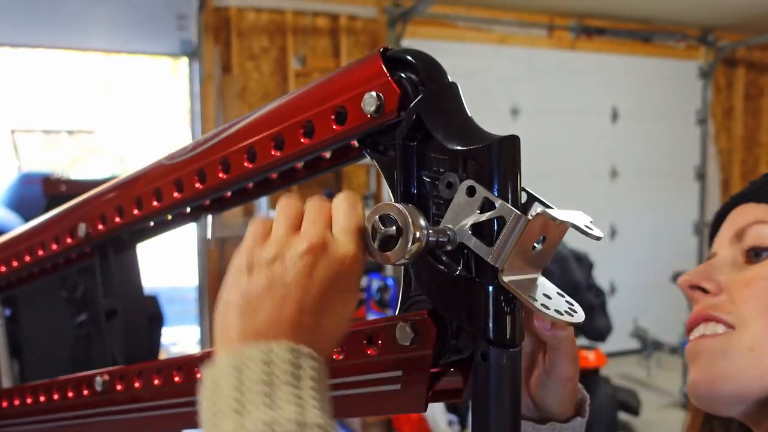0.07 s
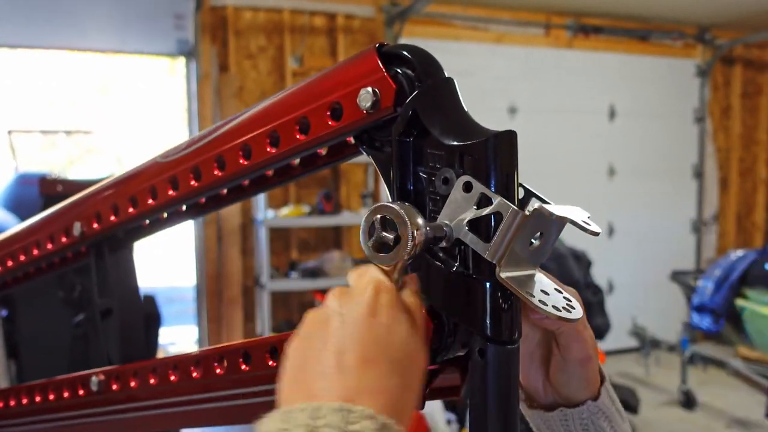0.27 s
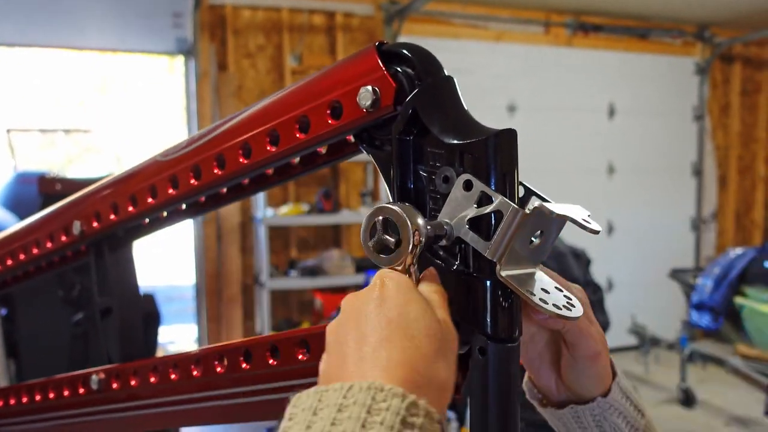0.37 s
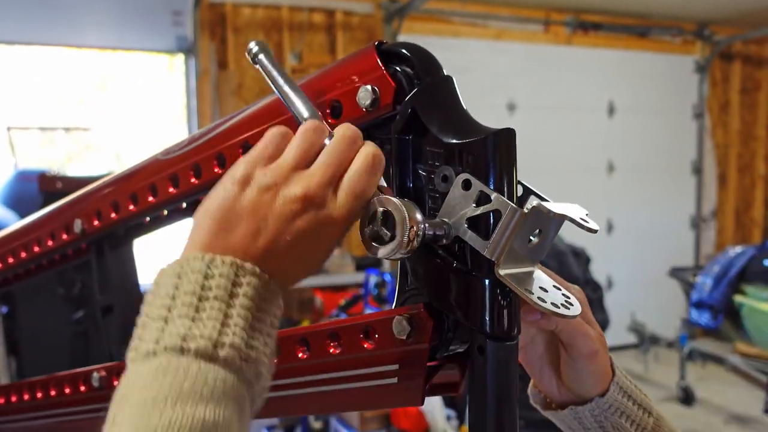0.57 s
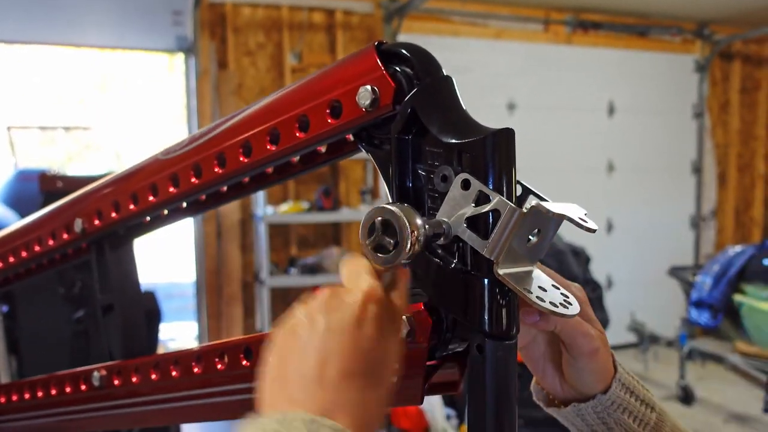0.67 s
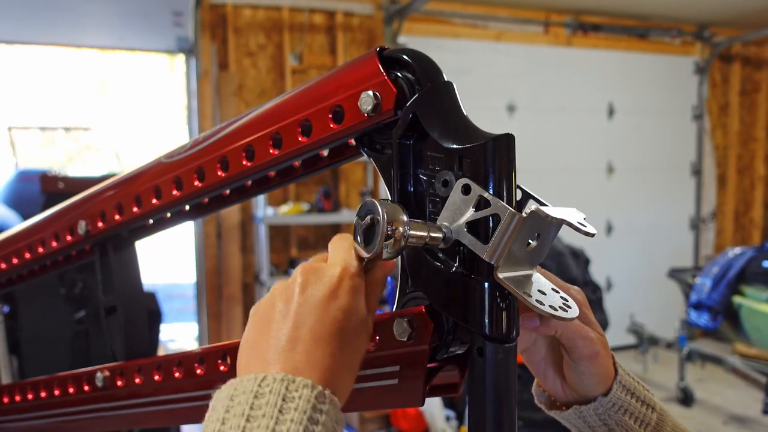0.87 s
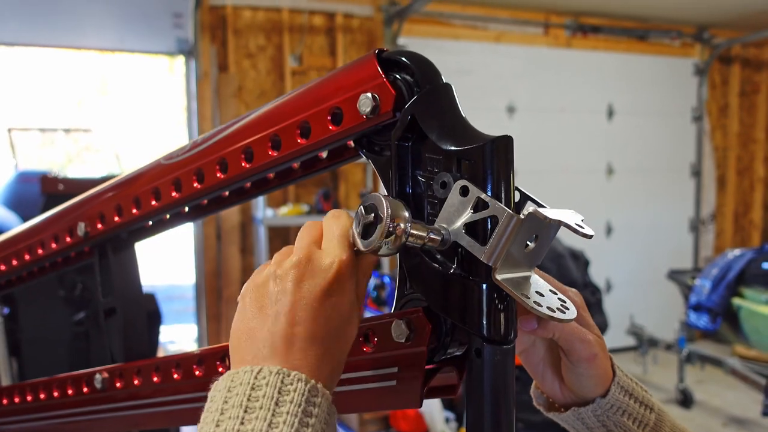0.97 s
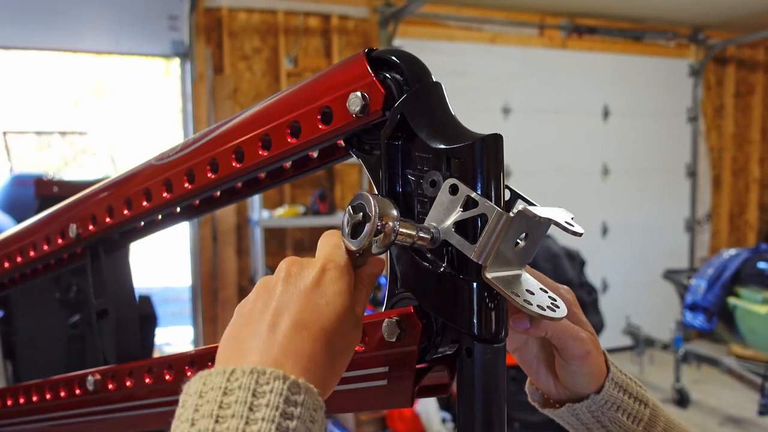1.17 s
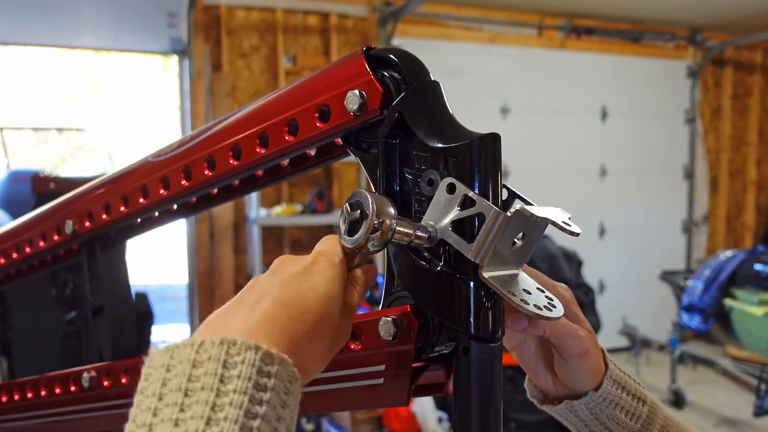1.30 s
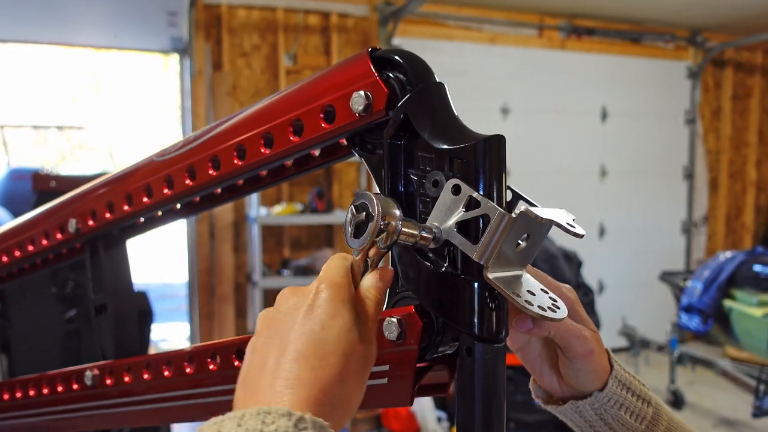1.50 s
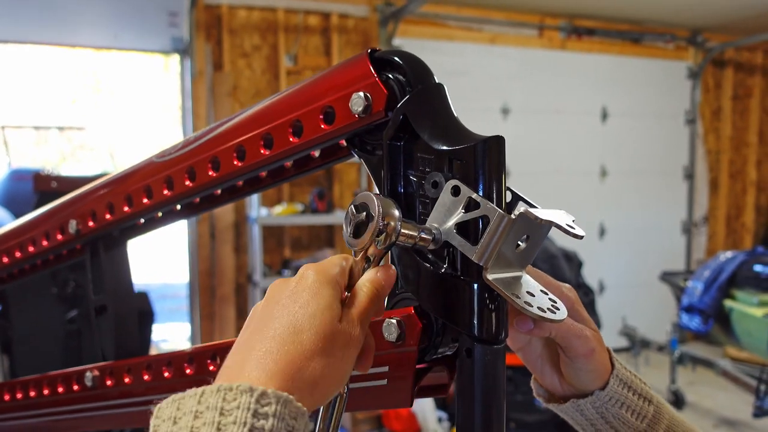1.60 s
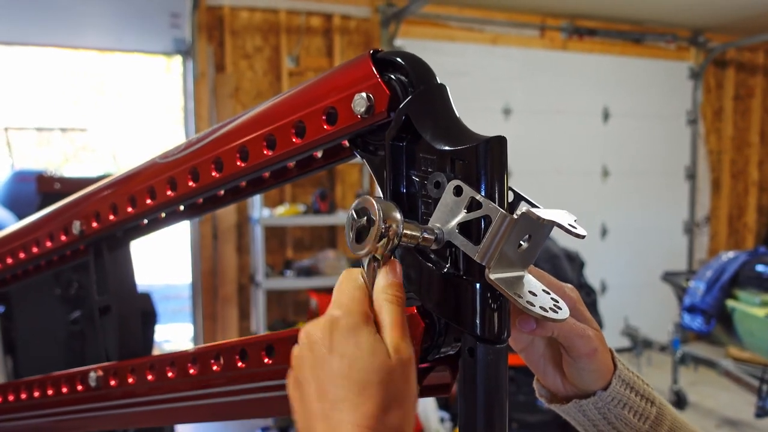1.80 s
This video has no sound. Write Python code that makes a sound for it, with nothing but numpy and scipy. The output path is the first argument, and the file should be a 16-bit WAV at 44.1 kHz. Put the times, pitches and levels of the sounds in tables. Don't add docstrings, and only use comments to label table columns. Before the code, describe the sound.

A hand ratchet on a tight bolt, heard close in stereo. After near quiet, a bright metallic grinding chatter runs 0.22-0.37 s, a click follows at 0.44, and a second rasping burst comes at 0.66-0.77. From 1.15 s crisp pawl clicks fall irregularly, with a quick run near 1.27, softer ones around 1.45, a sharp tick at 1.65 and a last cluster at 1.78. Hollow frame rumble, faint rubbing, short garage tail, soft hiss.

```python
import sys
import numpy as np
from scipy import signal
from scipy.io import wavfile
from scipy.ndimage import uniform_filter1d

SR = 44100
rng = np.random.default_rng(int(sys.argv[2]) if len(sys.argv) > 2 else 0)


def store_wav(level_fs):
    pcm = np.round(np.clip(np.atleast_2d(level_fs), -1, 1) * 32767)
    wavfile.write(sys.argv[1], SR, pcm.T.astype(np.int16))


def how_loud(loudness_db):
    steps = np.asarray(loudness_db, float) / 20
    return 10 ** steps


N = 81585
TIME = np.arange(N) / SR
BACK_STROKES_FROM_S = 1.0

# (frequency [Hz], width [Hz])
WRENCH_MODES = [(3860, 68), (4800, 210), (5750, 500), (7000, 98), (8100, 790), (9550, 230), (10000, 260),
                (11370, 160), (11850, 110), (13400, 160), (14900, 130), (15580, 150)]
GRIP_TIMES = [0, .275, .32, .42, .5, .703, .73, .76, 1.0, 1.165, 1.21, 1.266, 1.35, 1.47, 1.6, 1.7]
# (level [dB], ..)
GRIP_LEVELS = [(-14, -12, -1.5, -4, -5, -3, -4, -6, -17.5, -3, -8, -3.5),
               (-25.5, -44, -27.5, -9.5, -26.5, -2, -0.5, -16.5, -24, -29, -11.5, -16.5),
               (-12, -28.5, -16.5, 0, -23, 1.5, -3, -13, -15.0, -26, -30, -23),
               (-13, -27, -14.0, 1.5, -10, -4, -15, -11, -13, -21, -15.0, -13.0),
               (-3.5, -23, -12.5, -14, -13, 3, -3, -4, -24, -14.5, -10.5, -28),
               (-13, -24, -27.0, -17, -19, 1.5, -3, -23, -24, -25, -11.5, -15),
               (-16.0, -18, -15, -14, -8, -6, -9, -1.5, -13, -16, -15, -14),
               (-9.5, -9.5, -5, -2, -7, -1, -7, -12, -9, 0, -10.0, -19),
               (-13, -33, -23, -1, -12.5, -11, -12.5, -7.5, -9, -6, -11.5, -26.5),
               (-11, -30, -42, 6.5, -1, -19, -13, -1.5, -13.0, -18, -9, -20.0),
               (-8, -17, -23.0, 5, -2, -4, -15, -2, -13, -23, -16, -28),
               (-30, -18.5, -30.0, -4, -7, -26, -21, 9.5, -9, -28, -20, -19),
               (-8, -11, 2.5, 0.5, -10, 1, -13, -6, 0.5, 0, -10.5, -9),
               (-10, -17.5, 7.5, 0, -26, 3, -9.0, 0, 6.5, -24, -6.0, 4),
               (-22.5, -13, -9, -2, -11, -12.5, -12.5, 6, 0, -14, -22, -1.5),
               (-15.0, -36.5, -19, 1.5, -15, 0, -1, 0.5, -0.5, -17.0, -13.0, -6)]
GRIP_LEADS = [(1.5, -0.8, -0.9, 2.7, 1.5, 1.2, 1.1, 0.1, 0.0, -0.0, -0.0, 0.0),
              (2.5, -1.7, -1.9, 2.7, 1.2, 1.1, 1.1, 0.0, 0.0, -0.2, 0.0, 0.0),
              (2.8, -3.1, 3.0, 2.7, 2.5, 1.1, 1.1, 0.0, 0.0, 0.0, 0.0, 0.0),
              (2.9, -1.0, 2.9, 2.7, 3.0, 2.8, 3.0, -1.8, -1.8, -1.9, -1.9, -2.1),
              (2.8, 0.9, 2.0, -1.6, 2.2, -2.6, -2.6, -2.4, -2.4, -2.3, 0.3, 0.4),
              (3.0, -2.7, -0.1, -1.7, -2.7, -2.5, -2.5, -2.5, -2.7, -2.6, 0.4, 0.4),
              (-1.3, -1.7, -2.0, -1.7, -1.3, -2.6, -2.6, -2.5, -2.6, 0.2, 0.4, 0.3),
              (-1.3, -1.3, -1.7, -1.4, -1.9, -2.4, -2.6, -2.8, -2.6, 0.4, 1.4, 0.3),
              (-1.8, -1.7, -0.4, 0.2, 0.5, -0.4, -0.7, -2.1, -2.0, -2.1, -2.1, -2.1),
              (-1.6, 0.3, -2.5, 0.2, 1.7, -2.1, -2.1, -2.1, -2.1, -2.2, -2.2, -2.3),
              (-1.8, -1.7, -2.5, 0.2, 0.4, -2.0, -1.9, -2.0, -2.0, -2.3, -2.3, -2.7),
              (-2.2, -0.8, 0.2, 0.2, 2.9, -2.0, -2.9, -0.7, -0.7, -0.4, -2.0, -1.7),
              (-2.5, -1.2, 0.2, 1.8, 2.0, -2.7, -2.9, 1.0, 0.8, -0.7, -0.4, -0.2),
              (-2.4, -0.3, 0.2, 2.3, 2.9, -2.7, -2.7, 1.0, 0.8, -0.3, -0.4, -0.6),
              (-2.6, 2.3, 2.4, 2.5, -3.0, -0.5, -0.1, 0.9, 0.9, 1.9, -1.3, -1.6),
              (0.0, 0.0, 2.5, 2.7, 2.9, -1.8, -1.7, -0.4, -0.4, -1.1, -2.1, -2.3)]
# (time [s], peak level [dB])
BOLT_SLIPS = [(0.2201, -56), (0.236, -37.5), (0.246, -31), (0.2535, -32.5), (0.2605, -44), (0.2662, -34.5),
              (0.2701, -30), (0.2738, -37.0), (0.2782, -36), (0.2849, -19), (0.2895, -20), (0.2955, -18),
              (0.3026, -17.5), (0.3082, -41), (0.3131, -25.5), (0.3178, -36), (0.3204, -25),
              (0.3264, -18.5), (0.3337, -34), (0.3447, -21.5), (0.3532, -29), (0.3637, -29.5),
              (0.6624, -29), (0.6732, -22), (0.6795, -20.5), (0.6881, -30), (0.6937, -33), (0.7, -30),
              (0.7074, -19), (0.7118, -26), (0.7153, -22.5), (0.7204, -42), (0.7325, -29), (0.7362, -28),
              (0.7448, -25.5), (0.7484, -30), (0.751, -20), (0.7675, -36.5), (0.7727, -30.5)]
# (time [s], peak level [dB])
PAWL_CLICKS = [
    (.4445, -31.5),
    (1.1471, -26),
    (1.184, -22),
    (1.2287, -23),
    (1.4485, -43.5),
    (1.4903, -32.5),
    (1.7797, -36),
]
# (time [s], peak level [dB])
PAWL_TICKS = [
    (1.2613, -35),
    (1.2692, -23),
    (1.2803, -31.5),
    (1.3852, -53),
    (1.4588, -31),
    (1.6466, -21),
    (1.782, -31),
    (1.7902, -25.5),
]
# (time [s], level [dB])
THREAD_GRIND = [
    [(0.2, -74), (0.224, -72), (0.234, -28.5), (0.276, -29.5), (0.284, -16.5), (0.344, -21), (0.378, -42),
     (0.4, -52)],
    [(0.63, -69), (0.662, -17.5), (0.71, -13), (0.754, -27), (0.772, -34), (0.79, -81)],
]
# (time [s], level [dB])
HAND_EFFORT = [(0.0, -46.5), (0.01, -69.5), (0.164, -74.5), (0.236, -52.5), (0.304, -51), (0.622, -70),
               (0.638, -62), (0.68, -43.5), (0.916, -59.5), (0.998, -76.5), (1.276, -59.5), (1.35, -80),
               (1.494, -62.5), (1.602, -86.5), (1.648, -67.5), (1.746, -85), (1.818, -52), (1.85, -65)]
# (frequency [Hz], width [Hz], level under load [dB], level on back strokes [dB], left lead [rad])
FRAME_MODES = [(391, 116, -4.5, -8, .25), (505, 54, -1.5, 2.5, 0.75), (718.4, 72, 3.5, 1.5, 0.43),
               (889, 101, -0.5, -0.5, 0.39), (1047, 154, -4, 2.5, 1.6), (1297, 80, 1.5, 4.5, 0.79),
               (1519, 147, -2, -4, 1.25), (2422, 330, -10.5, -19.5, 3.97)]
# (time [s], peak level [dB])
HANDLE_BUMPS = [(0.004, -42.5), (0.215, -43.5), (0.304, -39.5), (0.446, -48), (0.54, -57), (0.636, -40.5),
                (0.849, -47), (0.904, -52.5), (1.275, -57), (1.382, -65), (1.813, -55)]
# (time [s], level [dB])
RACK_SWAY = [(0.0, -74), (0.272, -76), (0.334, -59), (0.576, -77), (0.808, -65), (1.122, -81), (1.716, -73),
             (1.85, -72)]
# (frequency [Hz], level [dB])
RUB_COLOUR = [(1060, -46.5), (1800, 2.5), (2670, -2), (3770, -2.5), (4410, -1), (16000, -6)]
# (frequency [Hz], 60 dB decay time [s])
ROOM_DECAY = [(500, 0.33), (3000, 0.36), (9000, 0.14), (16000, 0.27)]
# (frequency [Hz], level [dB])
AIR_COLOUR = [(12, -26), (24, 27.5), (101, 7.5), (527, 4.5), (607, -4), (1290, -5), (1910, -42),
              (9670, -19.5), (16000, -30)]


def evened(x):
    return x / np.sqrt(np.mean(np.abs(x) ** 2) + 1e-20)


def smoothed(x, size, axis=-1):
    return uniform_filter1d(uniform_filter1d(x, size, axis), size, axis)


def read(points, hz):
    f, value = np.transpose(points)
    return np.interp(np.log(hz + 1), np.log(f + 1), value)


def curve(points, outside=None):
    return np.interp(TIME, *np.transpose(points), outside, outside)


def force(events, db, rise_s, t60_s):
    power = np.zeros(N)
    for s, peak_db in events:
        t = TIME - s
        shape_db = np.where(t < 0, 8.2 * t / rise_s, -60 * t / t60_s)
        power += how_loud(peak_db + db + shape_db) ** 2
    return np.sqrt(power)


def ring(drive, hz, width, lead, order=1):
    r = np.exp(-np.pi * width / SR)
    half = np.exp(.5j * np.asarray(lead))
    pole = r * np.exp(2j * np.pi * hz / SR)
    sides = [drive * half, drive / half]
    return 2 * signal.lfilter([(1 - r) ** order], np.poly([pole] * order), sides).real


def grains(per_s, spread_db):
    chance, size, noise = rng.random(N), rng.exponential(1, N), rng.standard_normal(N)
    struck = (chance < per_s / SR) * how_loud(spread_db * np.minimum(size, 3))
    return evened(struck * np.sign(noise) + 0.21 * noise)


def hiss(colour, same, patchy_db):
    hz = np.fft.rfftfreq(512, 1 / SR)
    a, b, c, d, patches = rng.standard_normal((N // 128 + 5, 257, 5)).T
    patches = evened(uniform_filter1d(uniform_filter1d(patches, 8, 0), 16, 1))
    left = a + 1j * b
    right = same * left + np.sqrt(1 - same ** 2) * (c + 1j * d)
    level = how_loud(read(colour, hz)[:, None] + patchy_db * patches)
    return evened(signal.istft(np.array([left, right]) * level, nperseg=512, noverlap=384)[1][:, :N])


def bolt_slips():
    return force(np.subtract(BOLT_SLIPS, [0.00044, 0]), 5.5, rise_s=0.00093, t60_s=0.0044)


def pawl():
    snap_s, click_db = 0.00098, 6.5
    drops = np.add(PAWL_CLICKS, [snap_s, 0])
    clicks = force(drops, click_db, rise_s=snap_s, t60_s=0.0031)
    creep = force(drops, click_db - 16, rise_s=0.0048, t60_s=0.0048)
    ticks = force(np.add(PAWL_TICKS, [snap_s, 0]), click_db, rise_s=0.00032, t60_s=0.003)
    return clicks, creep, ticks


def wrench(slips, clicks, creep):
    shared = 0.35
    lock_db, lock_wander = -11, 0.0576
    shift_db = 4.5
    grind = sum(how_loud(curve(stroke, -200) - 6.5) for stroke in THREAD_GRIND)
    grip = np.searchsorted(GRIP_TIMES, TIME, "right") - 1
    db, lead = np.array(GRIP_LEVELS)[grip].T, np.array(GRIP_LEADS)[grip].T
    back, held = round(BACK_STROKES_FROM_S * SR), round(1.36 * SR)
    spans = [(slice(0, back), 1.32, 1),
             (slice(back, held), 1, 1),
             (slice(held, N), 1.46, how_loud(-0.5))]
    common, out = rng.standard_normal(N), np.zeros((2, N))
    for k, (hz, width) in enumerate(WRENCH_MODES):
        noise = shared * common + np.sqrt(1 - shared ** 2) * rng.standard_normal(N)
        wander = lock_wander * np.cumsum(rng.standard_normal(N))
        locked = how_loud(lock_db) * np.cos(2 * np.pi * hz * TIME + wander)
        turn = how_loud(shift_db * np.tanh(evened(smoothed(rng.standard_normal(N), 400))))
        blows = (np.sqrt(turn) * slips + clicks) * (0.52 * np.sign(noise) + locked)
        drive = blows + creep * noise + turn * grind * grains(per_s=3400, spread_db=0.5)
        drive = drive * how_loud(db[k]) * np.sqrt(150 / width)
        for span, wider, gain in spans:
            out[:, span] += gain * ring(drive[span], hz, wider * width, lead[k, span])
    crack = np.array([common, shared * common + rng.standard_normal(N)])
    out += how_loud(-26) * (slips + clicks + creep) * crack
    return signal.sosfilt(signal.butter(3, 2900, "high", fs=SR, output="sos"), out)


def frame(blows):
    jolts = 0.75 * grains(per_s=900, spread_db=3.5)
    bumps = force(HANDLE_BUMPS, -8, rise_s=0.00072, t60_s=.11)
    level = how_loud(curve(HAND_EFFORT)) + how_loud(-29.5) * blows + bumps
    out = np.zeros((2, N))
    for hz, width, load_db, back_db, lead in FRAME_MODES:
        gain = how_loud(np.where(TIME < BACK_STROKES_FROM_S, load_db, back_db))
        drive = gain * level * (jolts + rng.standard_normal(N))
        out += ring(drive, hz, 1.57 * width, lead, order=2)
    return how_loud(13.0) * out


def sway():
    return how_loud(curve(RACK_SWAY)) * evened(ring(rng.standard_normal(N), hz=142, width=22, lead=-0.69))


def rub():
    level_db = -67.5 + 0.44 * (curve(HAND_EFFORT) + 60)
    return how_loud(level_db) * hiss(RUB_COLOUR, same=.3, patchy_db=4)


def room(x):
    taps = np.zeros((2, SR // 2))
    at = np.arange(200, SR // 2 - 20, 20)
    places = at + rng.integers(0, 20, (2, len(at)))
    np.put_along_axis(taps, places, rng.choice([-1., 1.], (2, len(at))), 1)
    hz, t, z = signal.stft(taps, SR, nperseg=256)
    decay = how_loud(-60 * t / read(ROOM_DECAY, hz)[:, None])
    tail = signal.istft(z * decay, SR, nperseg=256)[1]
    return signal.fftconvolve(x, tail / np.linalg.norm(tail[0]), axes=1)[:, :N]


def garage_air():
    return how_loud(-68.5 - 3.5 * (TIME - 1)) * hiss(AIR_COLOUR, same=.7, patchy_db=3)


def scene():
    slips = bolt_slips()
    clicks, creep, ticks = pawl()
    near = how_loud(5.0) * wrench(slips, clicks + ticks, creep) + frame(slips + clicks + .5 * ticks)
    return near + how_loud(-24) * room(near) + sway() + rub() + garage_air()


def low_pass(x):
    return signal.sosfilt(signal.butter(12, 17140, fs=SR, output="sos"), x)


def record(dry):
    edge = signal.firwin(255, 16200, window=("kaiser", 7), fs=SR)
    mix = signal.oaconvolve(dry, edge[None], "same")
    return low_pass(mix)


dry = scene()
out = record(dry)
store_wav(out)
```